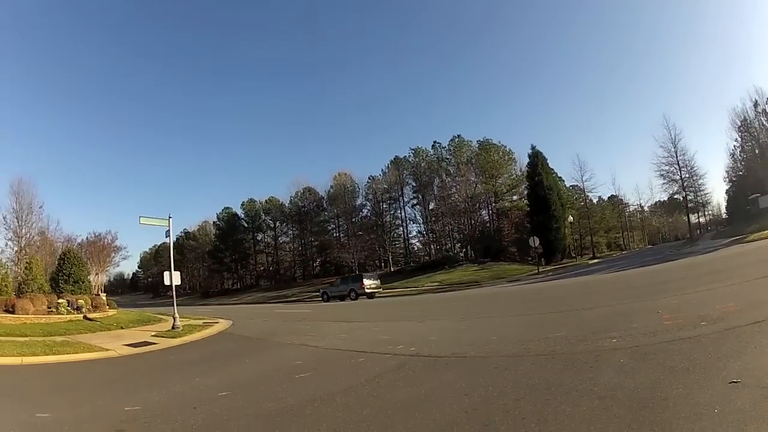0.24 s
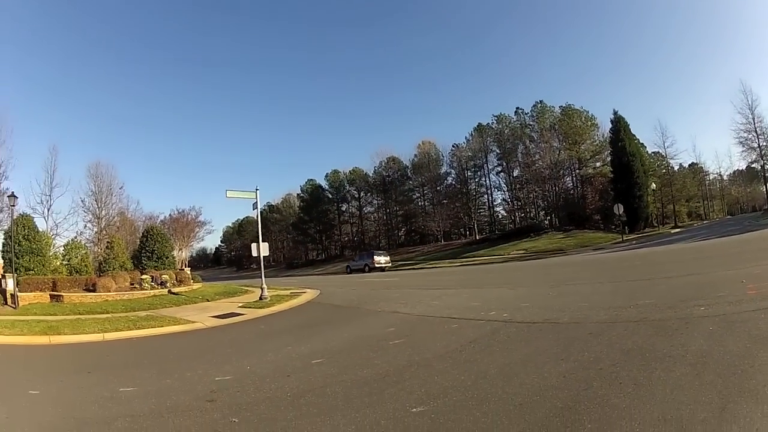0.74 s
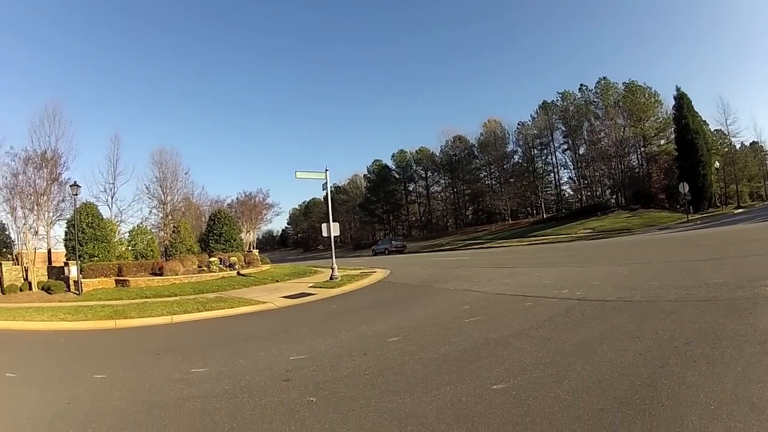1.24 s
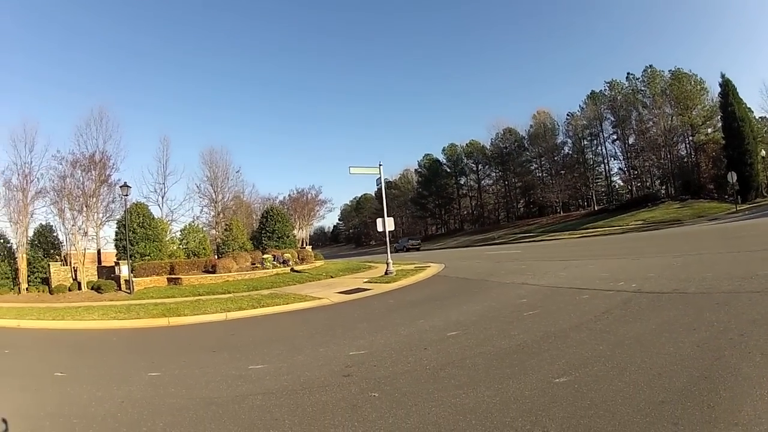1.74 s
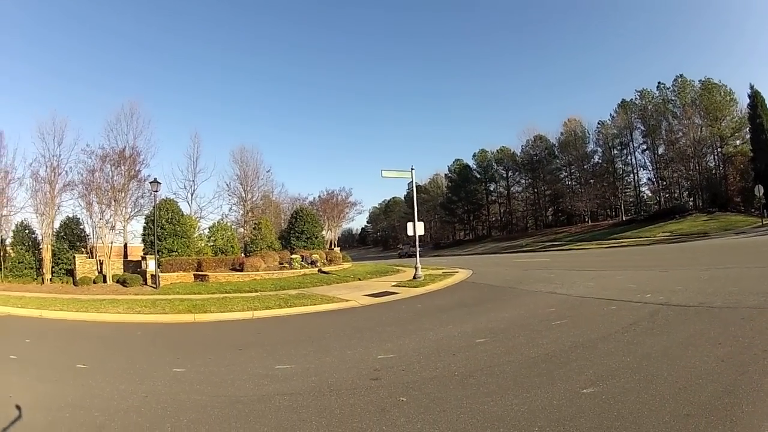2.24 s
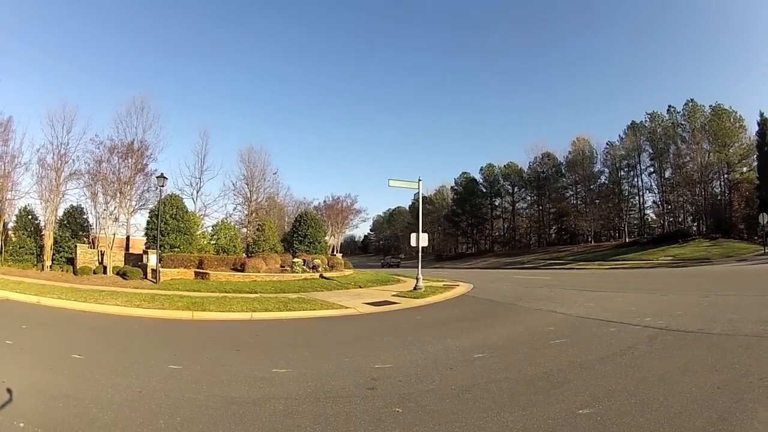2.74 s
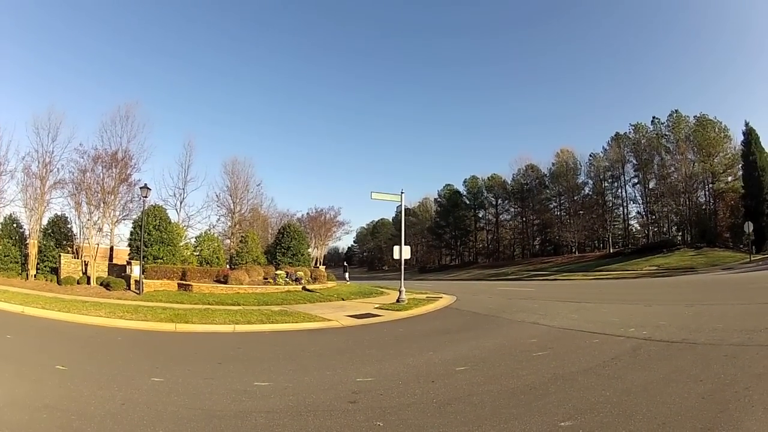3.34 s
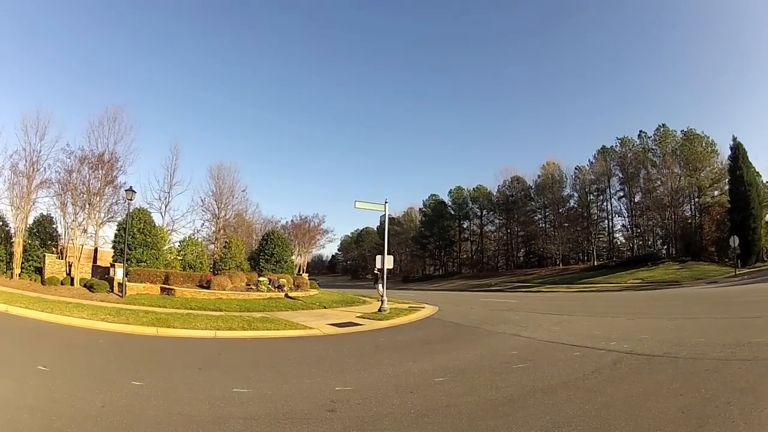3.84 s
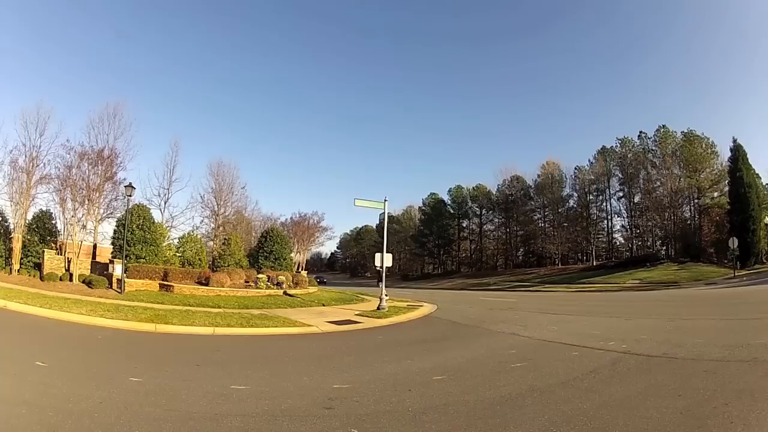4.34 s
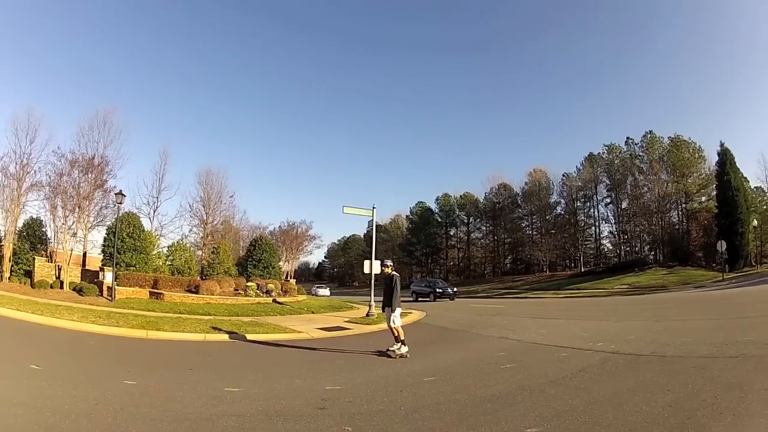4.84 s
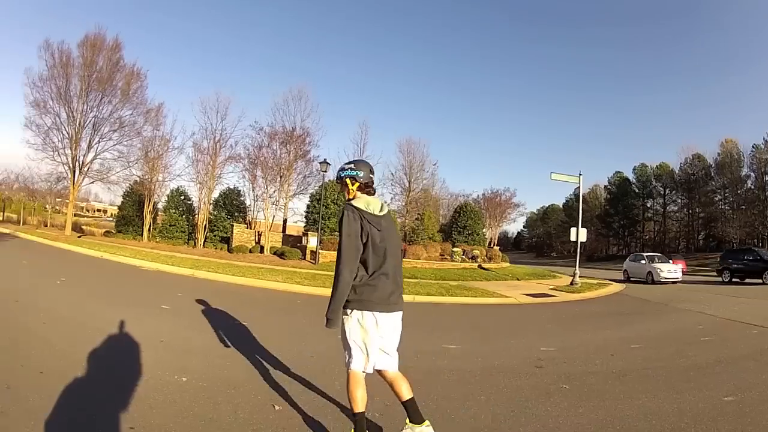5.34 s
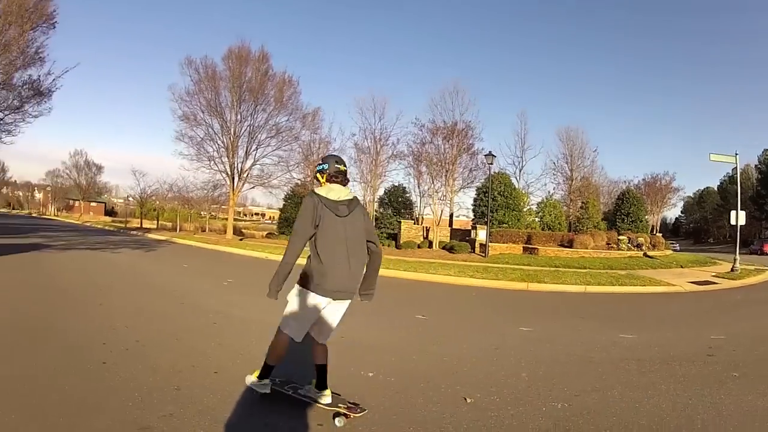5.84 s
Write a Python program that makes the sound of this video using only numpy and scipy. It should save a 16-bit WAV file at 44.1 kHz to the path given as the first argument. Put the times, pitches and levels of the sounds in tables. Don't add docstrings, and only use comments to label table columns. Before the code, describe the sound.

A small camera in a sealed housing beside a quiet suburban road. Deep wobbling rumble and faint dull hiss, a distant car fading, and one loud plastic crack early on. Softer knocks and thumps follow. After a brief dip, longboard wheels approach with a gritty whirr, then return in a hard scraping slide with heavy thumps and another very loud crack.

```python
import sys
import numpy as np
from scipy import signal
from scipy.fft import rfft, irfft
from scipy.io import wavfile
from scipy.ndimage import uniform_filter1d, map_coordinates

SR = 44100
rng = np.random.default_rng(int(sys.argv[2]) if len(sys.argv) > 2 else 0)


def master(y):
    cut = np.clip(np.atleast_2d(y).T, -1, 1)
    pcm = np.round(cut * 32767)
    wavfile.write(sys.argv[1], SR, pcm.astype(np.int16))


def elevation(decibels):
    levels = np.asarray(decibels, float)
    return 10 ** (levels / 20)


N = 268128

# time_s, fade_out_s, fade_in_s
CUT_FADES = [
    (2.856, 0.098, 0.12),
    (3.855, 0.098, 0.12),
    (4.622, 0.091, 0.087),
    (5.227, 0.09, 0.088),
]
# time_s, level_db
HOUSING_SHAKE = [(0, -56), (.3, -50.5), (.7, -55.5), (1.1, -53.5), (1.5, -57.5), (2, -56.5), (2.4, -46.5),
                 (2.75, -54), (3.1, -58), (3.45, -58), (3.75, -47), (4.2, -52.5), (4.7, -51), (5, -40.5),
                 (5.35, -51), (5.7, -45.5), (6.08, -44.5)]


def level(x):
    return x / np.sqrt(np.mean(x ** 2))


def walk(rate):
    k = int(SR / rate)
    held = np.repeat(rng.standard_normal(N // 100), k)[:N]
    return 1.22 * uniform_filter1d(uniform_filter1d(held, k), k)


def along(points):
    return np.interp(np.arange(N) / SR, *np.transpose(points))


def coloured(points):
    hz, db = np.transpose(points)
    f = np.fft.rfftfreq(N, 1 / SR) + 1
    gain = elevation(np.interp(np.log(f), np.log(hz), db))
    return level(irfft(rfft(rng.standard_normal(N)) * gain, N))


def resonate(x, peaks, flicker_db, rate):
    out = 0
    for hz, width_hz, db in peaks:
        b, a = signal.iirpeak(hz, hz / (1.24 * width_hz), SR)
        tone = level(signal.lfilter(b, a, signal.lfilter(b, a, x)))
        out = out + elevation(db + flicker_db * walk(rate)) * tone
    return level(out)


def ring(hz, t60, t):
    return np.sin(2 * np.pi * hz * t) * np.exp(-np.log(1000) * t / t60)


def waver(x):
    speed_change = 0.018 * walk(14)
    return map_coordinates(x, [np.arange(N) + np.cumsum(speed_change)], order=1, mode="mirror")


def side_hiss():
    # frequency_hz, level_db
    side_spectrum = [(35, -23), (60, -11.5), (120, -4.5), (394, -4.5), (496, -13), (3650, -17), (5060, -12),
                     (5900, -15.5), (7670, -61), (13000, -120)]
    return elevation(-80) * coloured(side_spectrum) * np.array([[1], [-1]])


def hiss():
    # frequency_hz, level_db
    hiss_spectrum = [(88, -37), (150, -8), (220, -4.5), (290, -7.5), (366, -8.5), (505, -14.5), (1700, -23),
                     (1950, -22.5), (2210, -24), (4910, -28), (5900, -29), (7670, -77), (13000, -120)]
    hiss_db = -64 + 0.082 * (along(HOUSING_SHAKE) + 55) + 0.89 * walk(9)
    return elevation(hiss_db) * coloured(hiss_spectrum)


def buffeting():
    # frequency_hz, width_hz, level_db
    deep_peaks = [(47.6, 20.2, 1.5), (29, 11, -9.5)]
    buffet_db = 4 * walk(12)
    deep = resonate(rng.standard_normal(N), deep_peaks, 1, 20)
    return elevation(along(HOUSING_SHAKE) + buffet_db) * deep


def mount_rumble():
    # frequency_hz, width_hz, level_db
    mount_peaks = [(79.3, 34.3, 1), (131, 45, -12)]
    mount = resonate(rng.standard_normal(N), mount_peaks, 2, 25)
    shaken_db = -60.5 + 0.45 * (along(HOUSING_SHAKE) + 56.5) + 2.5 * walk(10)
    return (elevation(shaken_db) + elevation(-3) * slide()) * mount


def car():
    # start_s, end_s, level_db, slope_db_per_s
    crossings = [
        (0, 2.6, -64, -8),
        (5.227, 6.1, -58, -1.5),
    ]
    # frequency_hz, level_db
    tyre_spectrum = [(290, -46.5), (500, -3), (746, -3.5), (1230, -7), (2140, -4.5), (2310, -7.5),
                     (2660, -2), (3050, -25), (4000, -25.5), (5200, -54), (8800, -120)]
    t = np.arange(N) / SR
    passing = 0
    for start_s, end_s, db, db_per_s in crossings:
        passing = passing + elevation(db + db_per_s * (t - start_s)) * (t >= start_s) * (t < end_s)
    return passing * elevation(walk(8.1)) * coloured(tyre_spectrum)


def slide():
    # start_s, length_s, level_db
    carves = [
        (5.25, .28, -65),
        (5.525, 0.38, -50),
        (5.598, 0.035, -41.5),
        (5.815, 0.11, -47),
    ]
    attack_s, release_s = 0.034, 0.029
    t = np.arange(N) / SR
    pressure = 0
    for start_s, length_s, db in carves:
        attack = np.clip((t - start_s) / attack_s, 0, 1)
        release = np.exp(-np.maximum(t - start_s - length_s, 0) / release_s)
        pressure = pressure + elevation(db) * attack * release
    return pressure


def grit(rate, spread_db):
    struck = rng.random(N) < rate / SR
    ticks = struck * elevation(spread_db * rng.exponential(size=N)) * rng.standard_normal(N)
    return level(ticks) + 0.5 * rng.standard_normal(N)


def wheels():
    # time_s, level_db
    nearness = [
        (3.9, -75),
        (4.1, -71.5),
        (4.6, -69.5),
        (4.66, -58),
        (5.05, -51.5),
        (5.2, -54),
        (5.26, -74),
        (5.45, -58),
        (5.65, -50.5),
        (6.08, -53),
    ]
    # frequency_hz, width_hz, level_db
    whirr_peaks = [(1618, 220, 0), (1773, 570, 11.5), (2080, 106, -4), (4000, 450, -57)]
    scrape_peaks = [(358, 48, -10.5), (646, 66, -3), (960, 250, 6.5), (1162, 200, -1)]
    upper_peaks = [(2483, 207, 0)]
    wash_peaks = [(3320, 240, -4), (505, 450, 5.5)]
    bearing_peaks = [(955, 61, -9), (1838, 70, 2.5), (2593, 46, -9.5)]
    lip_peaks = [(963, 40, -2), (1120, 40, 0), (1246, 54, -7)]
    rolling, sliding = elevation(along(nearness)), slide()
    road = grit(3000, 1.5) * elevation(walk(25))
    judder = grit(1500, 2.5) * elevation(1.5 * walk(45))

    def press(roll_db, slide_db, share):
        return np.hypot(elevation(roll_db) * rolling, elevation(slide_db) * sliding ** share)

    out = press(-2, -22, 0.9) * resonate(road, whirr_peaks, 0.69, 24)
    out += press(-14.5, -2.5, 0.92) * resonate(judder, scrape_peaks, 0.69, 24)
    out += press(-10, -28.5, 1) * resonate(road, upper_peaks, 0.69, 24)
    out += press(-23, -54, 0.2) * resonate(road, wash_peaks, 0.69, 24)
    out += press(-5, -40, 4) * waver(resonate(road, bearing_peaks, 1.9, 10))
    out += press(-40.5, -3.5, 1.1) * waver(resonate(road, lip_peaks, 1.9, 10))
    board_enters_s = CUT_FADES[1][0]
    return out * (np.arange(N) > board_enters_s * SR)


def stones():
    # start_s, level_db
    flicks = [
        (5.991, -53),
        (6.0054, -54),
    ]
    out, t = np.zeros(N + SR), np.arange(SR // 5) / SR
    for start_s, db in flicks:
        i = int(start_s * SR)
        bright = np.diff(rng.standard_normal(len(t) + 1))
        out[i:i + len(t)] += elevation(db + 10) * bright * np.exp(-t / 0.003)
    return out[:N]


def swing(t, hz):
    # pitch_ratio, level_db, t60_s
    mount_modes = [(1, 12, 0.061), (0.848, 6, .12), (1.9, -1, 0.032)]
    push = 1 - np.exp(-(t / 0.0048) ** 2)
    out = push * sum(elevation(db) * ring(ratio * hz, t60, t) for ratio, db, t60 in mount_modes)
    return out / np.abs(out).max()


def bumps():
    # start_s, level_db
    hand_bumps = [(0.173, -42), (1.093, -42), (2.334, -34.5), (2.407, -38), (2.489, -40.5), (2.526, -52),
                  (4.28, -35), (4.302, -37), (4.688, -40), (4.749, -43), (4.827, -43), (4.904, -49),
                  (5.05, -46), (5.449, -39), (5.539, -27), (5.58, -31.5), (5.934, -26)]
    out, t = np.zeros(N + SR), np.arange(SR // 5) / SR
    for start_s, db in hand_bumps:
        i = int(start_s * SR)
        out[i:i + len(t)] += elevation(db - 5) * swing(t, 100)
    return out[:N]


def rebounds(t):
    gaps = 0.15 + 0.12 * np.abs(rng.standard_normal(7))
    late_s = np.r_[0, np.cumsum(gaps)] * 0.004
    size = np.exp(-np.arange(8) / 1.5) * elevation(2 * rng.standard_normal(8))
    return size @ np.exp(-((t[:1200] - 0.0003 - late_s[:, None]) / 0.00007) ** 2)


def shell_ring(t, dull_db, bright_db):
    # frequency_hz, level_db, t60_s
    shell_modes = [(358, -6, 0.096), (644, -12, 0.04), (774, -8, 0.046), (949, 0, 0.022),
                   (995, -3.5, 0.023), (1145, -5, 0.02), (1336, -5, 0.034), (1466, 6.5, 0.0065),
                   (1875, 1.5, 0.021), (2335, -4.5, 0.0086), (2533, 0.5, 0.018), (3040, -24, 0.042),
                   (3335, -17, 0.023)]
    shell = np.zeros(len(t))
    for k, (hz, db, t60) in enumerate(shell_modes):
        mode_db = db + dull_db * (hz < 1300) + bright_db * (hz > 2100) + 2 * rng.standard_normal()
        detune = 1 + 0.008 * rng.standard_normal()
        shell += (-1) ** k * elevation(mode_db) * ring(hz * detune, t60, t)
    shell[:2] += elevation(-3) * 20 * np.array([1, -1])
    return shell


def knocks():
    # start_s, crack_db, thump_db over crack, dull_db below 1300 Hz, bright_db above 2100 Hz
    blows = [(0.13, -47, 11, 6, -14.5), (0.704, -17, 1, -1, -1), (1.891, -47, 7.5, -2, 2),
             (2.176, -31.5, -0.5, -2, 0), (2.24, -48, 14.5, 7, 6), (2.424, -45.5, -3, -1, 5),
             (2.442, -46, 11.5, 3, 2), (2.631, -48.5, 10.5, 5, 9), (2.66, -46.5, -9, 3, -1),
             (2.675, -46.5, -1, -9, -4), (2.775, -38.5, 9.5, 8, 1.5), (3.452, -52, 8, 8, -1),
             (3.531, -49, 2, -6, -7), (4.264, -25, -1.5, 6, 5), (5.268, -41, 4.5, 3.5, 4),
             (5.808, -16, -6.5, 4.5, 11.5)]
    out, t = np.zeros(N + SR), np.arange(SR // 5) / SR
    wall = signal.butter(6, 3900, fs=SR, output="sos")
    for start_s, crack_db, thump_db, dull_db, bright_db in blows:
        struck = signal.fftconvolve(shell_ring(t, dull_db, bright_db), rebounds(t))[:len(t)]
        crack = signal.sosfilt(wall, struck)
        thump_hz = 89 + 1.14 * (crack_db + 51.5)
        knock = crack / np.abs(crack).max() + elevation(thump_db) * swing(t, thump_hz)
        i = int(start_s * SR)
        out[i:i + len(t)] += elevation(crack_db - 1.5) * knock
    return out[:N]


def scene():
    background = hiss() + buffeting() + mount_rumble() + car()
    board_and_blows = wheels() + stones() + bumps() + knocks()
    return background + board_and_blows + side_hiss()


def roll_off(x):
    return signal.sosfilt(signal.butter(12, 16230, fs=SR, output="sos"), x)


def record(dry):
    slow = signal.sosfilt(signal.butter(6, 5500, fs=SR, output="sos"), dry)
    held = np.repeat(signal.resample_poly(slow, 40, 147, axis=1), 4, axis=1)
    out = signal.resample_poly(held, 147, 160, axis=1)[:, :N]
    out = signal.sosfilt(signal.ellip(8, 0.2, 38, 15500, fs=SR, output="sos"), out)
    t, fade = np.arange(N) / SR, 1
    for cut_s, out_s, in_s in CUT_FADES:
        ramp = np.maximum((cut_s - t) / out_s, (t - cut_s) / in_s)
        fade = fade * np.clip(ramp, 0.03, 1) ** 1.01
    return roll_off(fade * out)


dry = scene()
out = record(dry)
master(out)
```